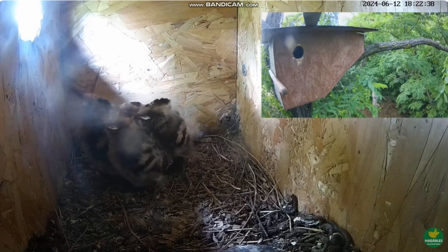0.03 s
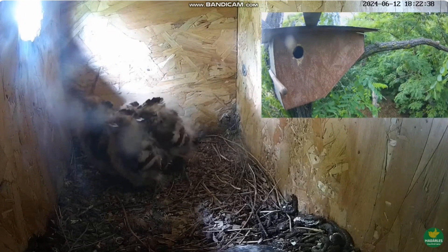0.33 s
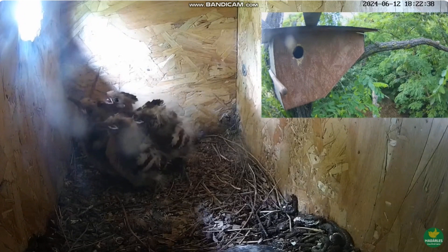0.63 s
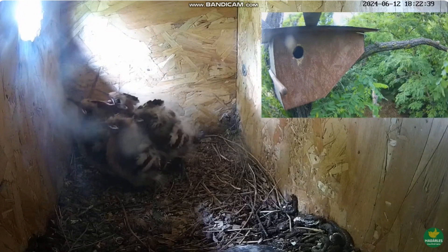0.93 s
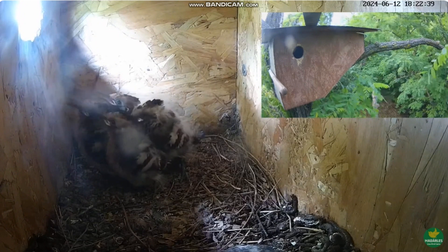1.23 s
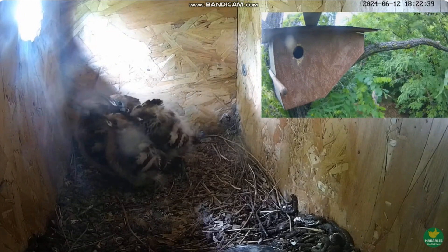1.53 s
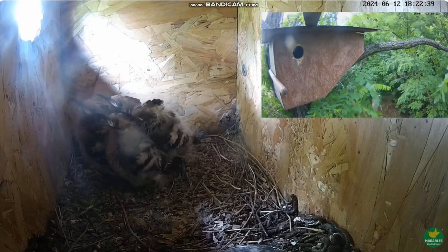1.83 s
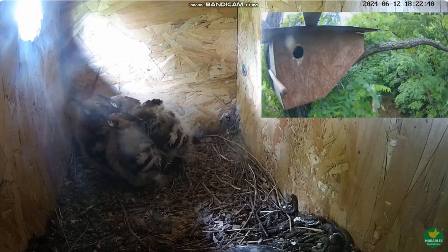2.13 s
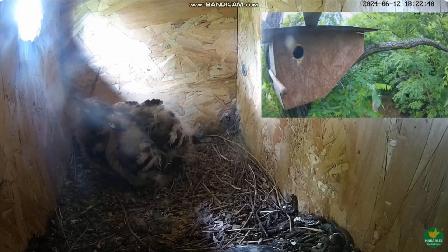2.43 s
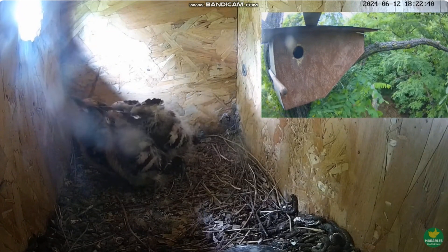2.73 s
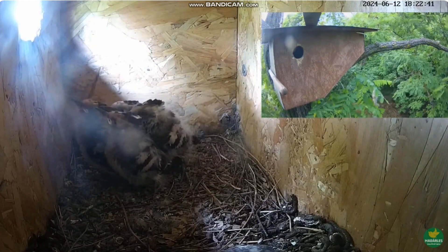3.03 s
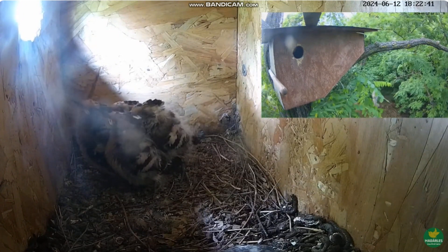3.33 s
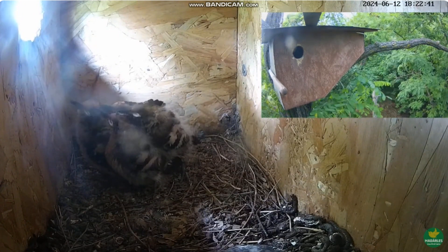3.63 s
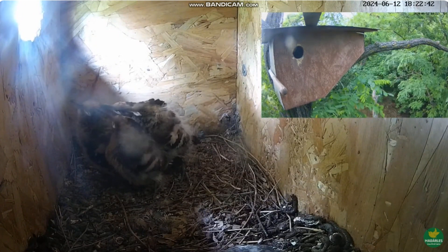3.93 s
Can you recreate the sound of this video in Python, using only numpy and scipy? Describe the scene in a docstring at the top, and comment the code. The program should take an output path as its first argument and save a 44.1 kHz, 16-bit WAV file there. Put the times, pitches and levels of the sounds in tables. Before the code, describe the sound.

Chicks beg with rapid, high, raspy chirps, often overlapping, with hoarse low peeps between them. They start loud, shuffle on dry litter and bump the floor, then call more weakly. Heard close inside a hollow wooden nest box.

```python
"""High, raspy begging chirps, often two at once: hoopoe chicks in a small wooden nest box.
Each chirp is a whistle that arches up and down in a swell of hiss; short, hoarse, low peeps fall
among them. The chicks shuffle on dry litter and bump the floor, and the boards and the air inside
add a short hollow ring. A faint outdoor hush lies under it all."""
import sys
import numpy as np
from scipy import signal
from scipy.fft import rfft, irfft
from scipy.io import wavfile
from scipy.ndimage import uniform_filter1d, minimum_filter1d

SR = 44100
rng = np.random.default_rng(int(sys.argv[2]) if len(sys.argv) > 2 else 0)


def store_wav(level_fs):
    """Save 16-bit WAV to argv[1]."""
    pcm = np.round(np.clip(np.atleast_2d(level_fs), -1, 1) * 32767)
    wavfile.write(sys.argv[1], SR, pcm.T.astype(np.int16))


N = 176400

# The colour of dry nest litter. Each row: frequency in Hz, relative level in dB.
LITTER_SPECTRUM = [(300, -20), (700, -2.5), (1400, 10.5), (3200, 5.5), (4500, -4), (12000, -24)]


def from_db(db):
    """Decibels to gain."""
    return 10 ** (np.asarray(db) / 20)


def rms_one(x):
    """Scale to unit rms."""
    return x / np.sqrt(np.mean(x ** 2) + 1e-20)


def add(out, start, x):
    """Mix x into out from the start time on."""
    i = int(round(start * SR))
    x, i = x[max(-i, 0):], max(i, 0)
    out[i:i + len(x)] += x[:max(N - i, 0)]


def flutter(rate_hz):
    """Smooth random motion with spread 1."""
    r = np.exp(-2 * np.pi * rate_hz / SR)
    return rms_one(signal.lfilter([1], [1, -2 * r, r * r], rng.standard_normal(N + SR))[SR:])


def noise(spectrum, grain_db=0.0, grain_hz=300):
    """Coloured noise at unit rms; a flickering level gives it grain."""
    hz, db = np.transpose(spectrum)
    bin_hz = np.arange(N // 2 + 1) * SR / N
    colour = from_db(np.interp(np.log(bin_hz + 1), np.log(hz), db))
    grainy = rng.standard_normal(N) * from_db(grain_db * flutter(grain_hz))
    return rms_one(irfft(rfft(grainy) * colour, N))


def gate(t, length, attack, release):
    """Smooth attack, hold and release, ending at the given length; all in seconds."""
    fade_in = np.sin(np.pi / 2 * np.clip(t / attack, 0, 1))
    fade_out = np.sin(np.pi / 2 * np.clip((length - t) / release, 0, 1))
    return fade_in * fade_out


def during(x, start, t):
    """The stretch of a signal that one event covers."""
    return np.take(x, int(start * SR) + np.arange(len(t)), mode="wrap")


def arch_droop(t, rise, fall, tail_ease=0.61):
    """A chirp's distance below its top pitch: 1 at both ends, 0 at the top; the fall eases off."""
    climb = np.abs(1 - t / rise) ** 1.7
    down = np.abs((t - rise) / fall)
    descent = (1 - tail_ease) * down ** 1.4 + tail_ease * np.sin(np.pi / 2 * down) ** 2
    return np.where(t < rise, climb, descent)


def chirps():
    """Arching whistles that break between throat registers, with a rough squeal below and hiss."""
    # Begging calls. Each row: start, rise time and fall time in seconds; start, top and end pitch
    # in Hz; relative levels of the early whistle, the late whistle and the rasp in dB.
    calls = [(-0.04, 0.019, 0.054, 6073, 7970, 5612, 1, -27, -30.5),
             (0.026, 0.023, 0.049, 5570, 8400, 5820, -23.5, -24, -32),
             (0.04, 0.011, 0.026, 7530, 9700, 8400, -35, -34, -47),
             (0.103, .02, .05, 5430, 8110, 4555, -19, -34.5, -32),
             (0.164, 0.023, 0.049, 5600, 9060, 3600, -39.5, -46, -46.5),
             (0.313, 0.01, 0.0088, 4570, 4630, 4590, -39.5, -53, -59),
             (0.338, 0.051, 0.053, 4636, 6380, 4390, -44, -41, -41.5),
             (0.363, 0.042, 0.022, 6330, 8960, 8500, -38.5, -40, -53),
             (0.404, 0.0027, .031, 6740, 7030, 4630, -34, -38, -57),
             (0.433, 0.045, 0.032, 5100, 6560, 3670, -41, -36.5, -47),
             (0.514, .042, .032, 4330, 9090, 3530, -41, -41.5, -42.5),
             (0.59, 0.023, 0.04, 5100, 7810, 6450, -30.5, -25.5, -37.5),
             (0.609, 0.0054, 0.0095, 9300, 9200, 8800, -34, -29, -51),
             (0.66, .023, .048, 6430, 8580, 5230, -25, -24, -33),
             (0.726, 0.027, 0.04, 5390, 9000, 5860, -27, -30, -33.5),
             (0.794, 0.021, 0.051, 7160, 8930, 5760, -21.5, -21, -28.5),
             (0.857, .023, 0.051, 5800, 8630, 6940, -20, -27, -31.5),
             (0.927, 0.024, .06, 5490, 8750, 4290, -19.5, -28.5, -31.5),
             (1.028, 0.039, 0.07, 4590, 6700, 5450, -44, -47.5, -44.5),
             (1.051, 0.056, .024, 7200, 8670, 4580, -43.5, -38, -37.5),
             (1.144, 0.008, 0.015, 4480, 5310, 4570, -28, -39, -49),
             (1.174, 0.033, 0.057, 4880, 7650, 4200, -37, -31, -39),
             (1.185, 0.024, 0.084, 6900, 8250, 3700, -25.5, -49.5, -45.5),
             (1.363, 0.053, 0.038, 4390, 6610, 4320, -44, -42.5, -50),
             (1.471, 0.022, .058, 5186, 7330, 4650, -31.5, -37, -37.5),
             (1.523, 0.033, 0.03, 6420, 8680, 4380, -31, -40, -36.5),
             (1.556, 0.013, 0.047, 6170, 5930, 3800, -58, -51, -57),
             (2.017, 0.036, 0.044, 4680, 7830, 4040, -41, -41.5, -50),
             (2.115, 0.049, 0.036, 3960, 6540, 3765, -43, -54.5, -43),
             (2.15, 0.016, 0.013, 7470, 9100, 7200, -45, -48, -50),
             (2.325, 0.039, 0.049, 4500, 8400, 4040, -41, -45, -48.5),
             (2.363, 0.025, 0.048, 4990, 5320, 5640, -40.5, -53.5, -56),
             (2.421, 0.044, 0.015, 5480, 8640, 4040, -43.5, -47, -38.5),
             (2.421, .042, 0.013, 4400, 6060, 6040, -42, -35, -45.5),
             (2.474, .022, .026, 8370, 8800, 4000, -39, -44, -40),
             (2.736, 0.044, 0.064, 4530, 5825, 4240, -46, -44, -59),
             (2.748, 0.05, 0.029, 4650, 8310, 4000, -44, -45, -48.5),
             (2.831, 0.038, 0.022, 4310, 8800, 4350, -39.5, -47.5, -43),
             (2.901, .036, .06, 6200, 7200, 3880, -42.5, -50, -60),
             (2.897, 0.044, 0.034, 4700, 8740, 5270, -48, -45, -44),
             (3.084, 0.033, 0.045, 4600, 8150, 4040, -44.5, -49, -50),
             (3.126, 0.051, 0.022, 4800, 5560, 4250, -43.5, -42.5, -59),
             (3.206, 0.047, 0.038, 4136, 6480, 4540, -39, -42, -41),
             (3.225, 0.056, 0.025, 6250, 8730, 4110, -41.5, -38.5, -40),
             (3.347, 0.035, 0.019, 4710, 5970, 4510, -37.5, -42, -57),
             (3.476, .034, 0.034, 4550, 8430, 4030, -42.5, -46.5, -49),
             (3.639, 0.041, 0.034, 4400, 8680, 3770, -42, -41, -40.5),
             (3.626, .044, 0.061, 3700, 6830, 3510, -45, -47.5, -54),
             (3.72, 0.032, 0.025, 4790, 5900, 4410, -43, -41.5, -55),
             (3.792, 0.028, 0.046, 4660, 8470, 3920, -41.5, -45.5, -51.5),
             (3.962, 0.047, 0.011, 4800, 8280, 5000, -47.5, -26, -42.5)]
    # Throat resonances that colour the whistle. Each row: frequency in Hz, gain in dB.
    throat_gain = [(3600, -5), (4300, -10), (4900, 3.5), (5700, 0), (7100, 4), (7900, -1), (8700, 4.5)]
    # The colour of the hiss. Each row: frequency in Hz, relative level in dB.
    hiss_spectrum = [(250, -40), (1400, -15.5), (2200, -20), (3000, -8), (4000, -17.5), (5400, -4.5),
                     (8400, -12), (9700, -13), (12000, -10.5), (15500, -26)]
    register_hz, register_step_hz, register_pull = 5290, 1704, .6
    pitch_jitter, screech_jitter, full_screech_db = .019, .028, -30
    top_dip_db, tremble_db, rasp_swell_db = 5, 4, 4
    octave_resonance_hz, octave_half_width_hz = 12000, 3000
    squeal_pitch_ratio, squeal_half_width_hz = .86, 1500
    hiss_growth = 1.139  # hiss grows faster than the squeal as a chick strains

    whistle, squeal, hiss_power = np.zeros((3, N))
    wobble = flutter(410) + flutter(65)
    tremble = np.tanh(flutter(81))
    fray = flutter(910)
    squeal_filter = signal.butter(3, squeal_half_width_hz, fs=SR, output="sos")
    roughness = rms_one(signal.sosfilt(squeal_filter, rng.standard_normal((2, N))))
    for start, rise, fall, start_hz, top_hz, end_hz, early_db, late_db, rasp_db in calls:
        length = rise + fall
        t = np.arange(int((length + 0.00135) * SR)) / SR
        droop = arch_droop(t, rise, fall)
        arch_hz = top_hz - droop * (top_hz - np.where(t < rise, start_hz, end_hz))
        # Hard begging frays the whistle into a screech.
        strain = min(from_db(rasp_db - full_screech_db), 1) * (1 - droop / 2)
        screech = screech_jitter * strain * during(fray, start, t)
        hz = arch_hz * (1 + pitch_jitter * during(wobble, start, t) + screech)
        # The pitch clings to evenly spaced throat resonances and breaks between them.
        hz_per_radian = register_step_hz / (2 * np.pi)
        hz -= register_pull * hz_per_radian * np.sin((hz - register_hz) / hz_per_radian)
        phase = 2 * np.pi * np.cumsum(hz) / SR

        db = np.interp(t / length, [.25, .75], [early_db, late_db])
        db += np.interp(hz, *np.transpose(throat_gain))
        db += top_dip_db * (np.minimum(2 * droop, 1) - .5)  # the whistle gives way to rasp at the top
        db += tremble_db * during(tremble, start, t)
        # The octave grows through the call and sounds mainly near its resonance.
        detuning = (2 * hz - octave_resonance_hz) / octave_half_width_hz
        octave = from_db(-16 - 11 * (1 - t / length)) / (1 + detuning ** 2)
        rough_a, rough_b = (during(x, start, t) for x in roughness)
        voice = np.sqrt(2) * (np.sin(phase) + octave * (2 + rough_a) * np.sin(2 * phase))
        add(whistle, start, from_db(db) * gate(t, t[-1], attack=0.0042, release=0.0027) * voice)

        # Squeal and hiss swell to the top of the arch; the squeal is a noise band under the pitch.
        swell = from_db(rasp_db - rasp_swell_db * droop) * np.sqrt(gate(t, t[-1], rise, fall))
        squeal_phase = squeal_pitch_ratio * phase
        add(squeal, start, swell * (rough_a * np.cos(squeal_phase) + rough_b * np.sin(squeal_phase)))
        add(hiss_power, start, swell ** (2 * hiss_growth))
    hiss = np.sqrt(hiss_power) * noise(hiss_spectrum, grain_db=1.5, grain_hz=300)
    return from_db(-1.5) * whistle + from_db(-3) * squeal + from_db(4.5) * hiss


def peeps():
    """Short low notes of four harmonics that bend up or down, each wrapped in a hoarse croak."""
    # Low calls. Each row: start and length in seconds; start and end pitch in Hz; relative levels
    # of the fundamental, the overtones and the croak in dB.
    calls = [(0.0, 0.042, 915, 976, -47.5, -51, -47), (0.114, 0.033, 1392, 730, -59, -54, -43),
             (0.322, 0.052, 601, 940, -55, -55.5, -42), (0.384, 0.037, 1196, 1126, -45, -71, -39.5),
             (0.437, 0.029, 583, 528, -55.5, -58, -43.5), (0.481, 0.04, 1379, 870, -49, -53, -41),
             (0.646, 0.037, 730, 1027, -52.5, -52.5, -47), (0.691, 0.033, 1262, 1070, -43.5, -74, -41.5),
             (1.016, 0.041, 573, 1030, -55, -58.5, -42.5), (1.051, 0.043, 1232, 1080, -44.5, -65, -44.5),
             (1.128, 0.034, 634, 490, -57, -62.5, -49), (1.173, 0.041, 1325, 1263, -54, -58.5, -41),
             (1.332, 0.033, 1023, 1266, -48, -61.5, -47), (1.435, 0.056, 477, 628, -74.5, -76, -43),
             (1.484, 0.039, 1415, 990, -47.5, -52, -47), (1.582, 0.013, 593, 516, -58, -73, -51.5),
             (1.992, 0.05, 454, 665, -75, -61, -43), (2.099, 0.026, 877, 1003, -53, -60, -45.5),
             (2.3, 0.042, 461, 640, -70.5, -60.5, -42.5), (2.387, 0.046, 1330, 816, -56.5, -52.5, -40),
             (2.513, 0.027, 657, 524, -56.5, -62, -49), (2.7, 0.029, 1096, 1216, -47, -65.5, -55.5),
             (2.743, 0.021, 503, 593, -70, -57.5, -46.5), (2.798, 0.043, 760, 1144, -55, -55, -44),
             (2.873, 0.037, 1390, 910, -53, -54, -39), (3.063, 0.023, 449, 665, -67.5, -55.5, -45.5),
             (3.072, 0.044, 1180, 1180, -49.5, -78, -53), (3.187, 0.035, 1432, 890, -49.5, -55.5, -39.5),
             (3.305, 0.023, 636, 570, -57.5, -64, -53), (3.315, 0.034, 1166, 1150, -50.5, -89, -84),
             (3.449, 0.037, 456, 689, -72, -58, -44.5), (3.604, 0.048, 1401, 967, -47, -55, -40.5),
             (3.658, 0.049, 1163, 1142, -48.5, -78, -54), (3.767, 0.036, 464, 669, -75, -59.5, -44.5),
             (3.934, 0.046, 1392, 1015, -48, -56, -42.5), (3.983, 0.038, 1178, 1145, -46.5, -60, -53.0)]
    # The colour of the croak. Each row: frequency in Hz, relative level in dB.
    croak_spectrum = [(250, -37), (550, -4.5), (800, 0.5), (1350, 6), (2800, 9), (4500, 1.5), (8000, -12.5)]
    pitch_sag, pitch_jitter, loss_per_harmonic_db = 0.18, .02, 7
    croak_margin_s = 0.022  # the croak swells in before the note and outlasts it
    tone, croak_level = np.zeros((2, N))
    wobble = flutter(340)
    for start, length, start_hz, end_hz, fundamental_db, overtone_db, croak_db in calls:
        t = np.arange(int(length * SR)) / SR
        middle_hz = max(start_hz, end_hz) - pitch_sag * abs(end_hz - start_hz)
        bend = np.polyfit([0, .5, 1], [start_hz, middle_hz, end_hz], 2)
        hz = np.polyval(bend, t / length) * (1 + pitch_jitter * during(wobble, start, t))
        phase = 2 * np.pi * np.cumsum(hz) / SR
        voice = from_db(fundamental_db) * np.sin(phase)
        for k in range(2, 5):
            voice += from_db(overtone_db - loss_per_harmonic_db * (k - 2.5)) * np.sin(k * phase)
        add(tone, start, np.sqrt(2) * gate(t, length, attack=0.0099, release=0.013) * voice)
        swell = np.hanning(int((length + 2 * croak_margin_s) * SR))
        add(croak_level, start - croak_margin_s, from_db(croak_db) * swell)
    croak = croak_level * noise(croak_spectrum, grain_db=3.5, grain_hz=388)
    return from_db(4.5) * tone + from_db(-6) * croak


def shuffles():
    """Bodies thud softly on the floor and stir the dry litter."""
    # Movements. Each row: start and length in seconds, relative thud and rustle levels in dB.
    moves = [(0.0, 0.24, -57, -51.5), (0.612, 0.28, -61, -56.5), (0.867, .15, -50.5, -56),
             (1.552, 0.22, -68, -58)]
    # The dull colour of the floor. Each row: frequency in Hz, relative level in dB.
    thud_spectrum = [(35, -64), (120, -31), (200, 3.5), (310, 11), (450, -10), (1500, -35.5)]
    t = np.arange(N) / SR
    thud_level, rustle_level = np.zeros((2, N))
    for start, length, thud_db, rustle_db in moves:
        envelope = gate(t - start, length, attack=0.025, release=0.63 * length)
        thud_level += from_db(thud_db) * envelope
        rustle_level += from_db(rustle_db) * envelope
    thud = thud_level * noise(thud_spectrum, grain_db=6.0, grain_hz=69.6)
    rustle = rustle_level * noise(LITTER_SPECTRUM, grain_db=3.0, grain_hz=198.7)
    return thud + rustle


def knocks():
    """Bumps ring the floor board briefly, each starting with a dry tap in the litter."""
    # Bumps on the board. Each row: start in seconds, relative level in dB.
    bumps = [(0.911, -40.5), (0.94, -50)]
    board_hz, board_t60_s = 255, .06
    tap_db, tap_t60_s = -5, .015
    out, t = np.zeros(N), np.arange(SR // 10) / SR
    litter = noise(LITTER_SPECTRUM)
    for start, db in bumps:
        add(out, start, from_db(db - 60 * t / board_t60_s) * np.sin(2 * np.pi * board_hz * t))
        add(out, start, from_db(db + tap_db - 60 * t / tap_t60_s) * during(litter, start, t))
    return out


def nest_box(x):
    """Dense quick reflections between the boards, and a few ringing air modes."""
    # Air resonances of the box. Each row: frequency and bandwidth in Hz, gain in dB.
    air_modes = [(511.7, 43, 18), (1221, 25, 0.5), (1436, 49, 1.5), (2583, 57, 4.5)]
    first_reflection_s, tail_t60_s = 0.00075, 0.032
    t = np.arange(SR // 4) / SR
    tail = rng.standard_normal(len(t)) * from_db(-60 * t / tail_t60_s) * (t > first_reflection_s)
    reflections = signal.fftconvolve(x, tail / np.linalg.norm(tail))[:N]
    out = x + from_db(-3) * reflections
    for hz, width_hz, db in air_modes:
        r = np.exp(-np.pi * width_hz / SR)
        feedforward = np.array([1, 0, -1]) * (1 - r * r) / 2
        feedback = [1, -2 * r * np.cos(2 * np.pi * hz / SR), r * r]
        out += from_db(db) * signal.lfilter(feedforward, feedback, x + 1e-18)
    return out


def outdoor_hush():
    """A faint, steady bed of outdoor noise, fullest in the low mids."""
    # The colour of the hush. Each row: frequency in Hz, relative level in dB.
    hush_spectrum = [(29, -55), (50, -28), (322, -5.5), (408, -14), (827, -27.5), (1320, -17.5),
                     (2450, -24.5), (2880, -17), (7770, -32.5), (11300, -29), (14000, -37.5)]
    return from_db(-66) * noise(hush_spectrum)


def scene():
    """The brood in its box, over the outdoor hush, in mono."""
    brood = from_db(-4.0) * (chirps() + peeps() + shuffles() + knocks())
    return (nest_box(brood) + outdoor_hush())[None]


def record(dry):
    """Deep bass is cut, a limiter holds the peaks, and the top treble drops to a faint sizzle."""
    low_cut_hz, treble_edge_hz, high_cut_hz = 80, 12650, 15800
    ceiling, limiter_samples, sizzle_db = .14, 200, -24.5
    thinned = signal.sosfilt(signal.butter(3, low_cut_hz, "high", fs=SR, output="sos"), dry)
    gain = ceiling / np.maximum(np.abs(thinned), ceiling)
    held_gain = minimum_filter1d(gain, size=limiter_samples)
    limited = thinned * uniform_filter1d(held_gain, size=limiter_samples)
    body = signal.sosfilt(signal.ellip(8, .5, 60, treble_edge_hz, fs=SR, output="sos"), limited)
    high_cut = signal.ellip(10, .3, 80, high_cut_hz, fs=SR, output="sos")
    return signal.sosfilt(high_cut, body + from_db(sizzle_db) * limited)


dry = scene()
out = record(dry)
store_wav(out)
```